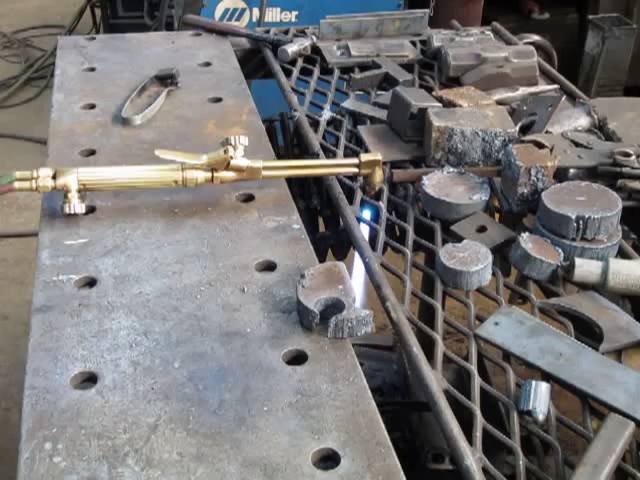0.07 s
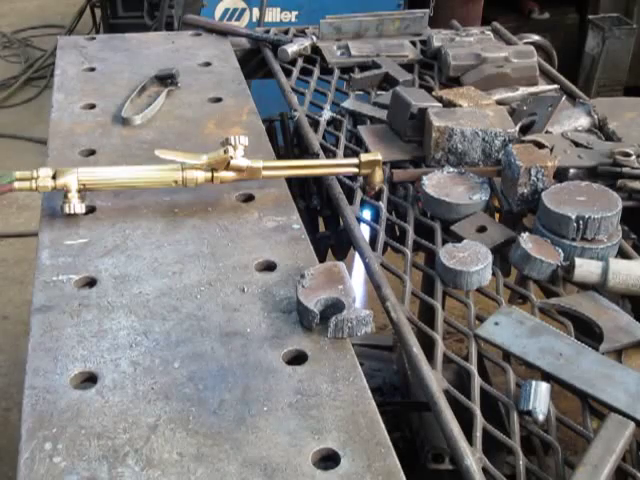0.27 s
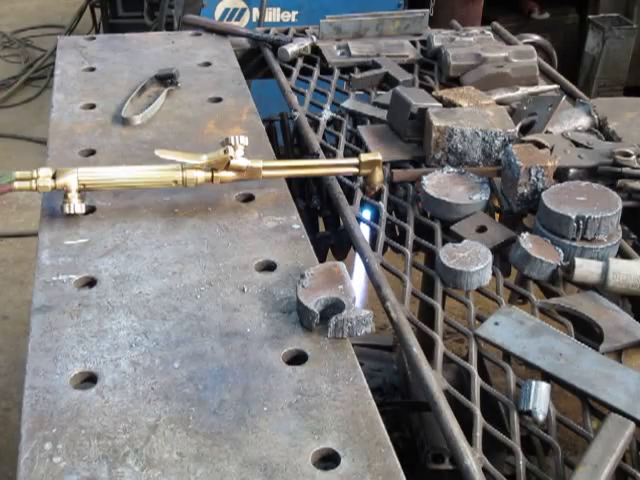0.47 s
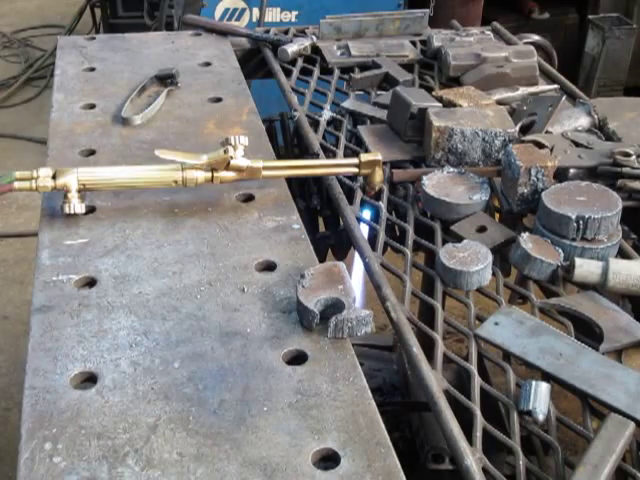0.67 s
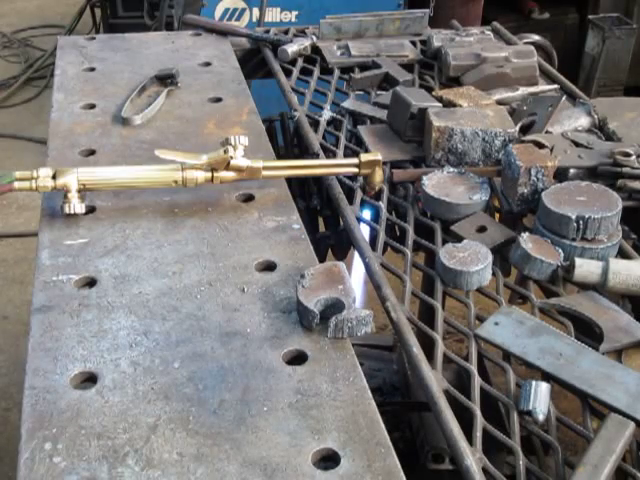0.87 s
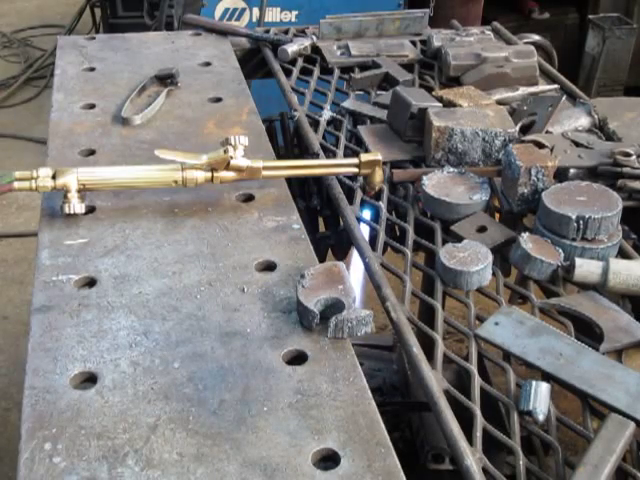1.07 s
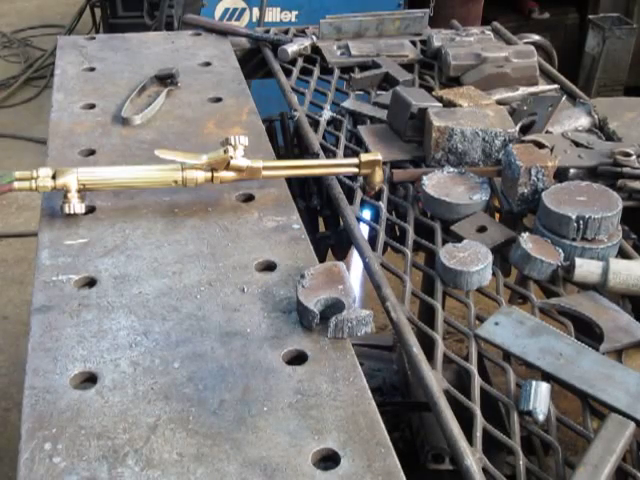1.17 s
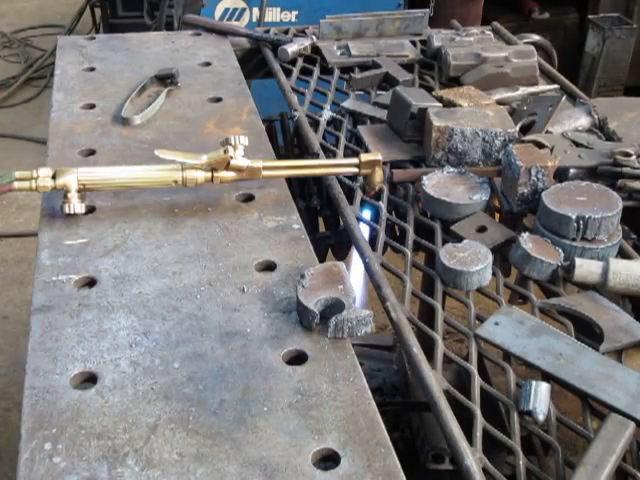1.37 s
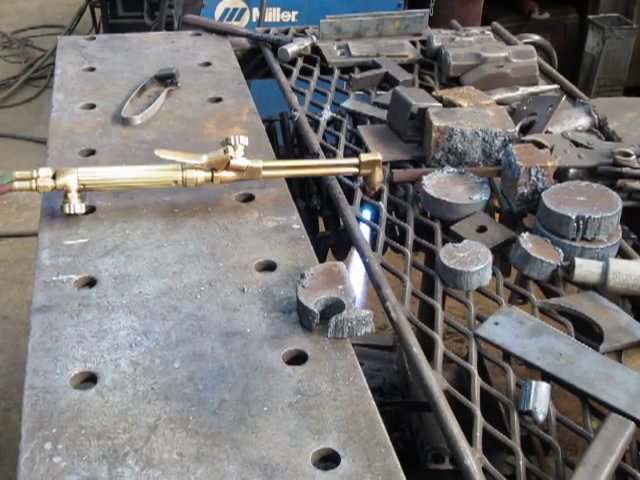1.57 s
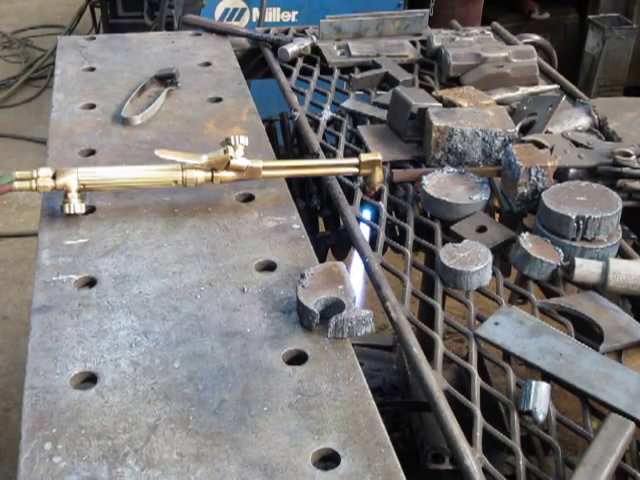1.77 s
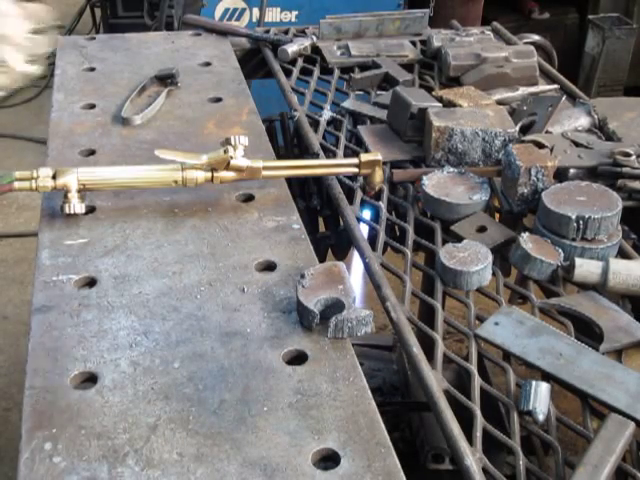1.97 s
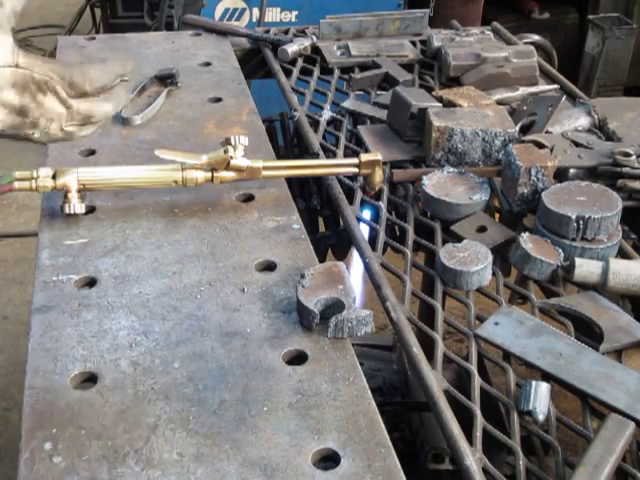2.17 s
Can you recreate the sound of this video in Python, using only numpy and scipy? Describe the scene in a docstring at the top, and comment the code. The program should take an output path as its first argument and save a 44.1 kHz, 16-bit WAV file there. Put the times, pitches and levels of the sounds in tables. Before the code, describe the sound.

Continuous gas torch roar, heavy in the low mids with a hollow, rough ring, under a fine hiss and thin wavering whistle; it swells over the first second, with one brief sputtering flare late on, heard close in a workshop.

```python
"""A broad roar, a hiss and a faint, unsteady high whistle cut in abruptly and grow a little stronger.
A lit gas cutting torch lies on a steel workbench and burns steadily. Its turbulent flame is noise
shaped by resonances of bench and workshop, over low drone tones and a hollow ring; the gas jet is
bright noise with one brief, grainy flare; the nozzle whistle is a jittery tone in a narrow rush."""
import sys
import numpy as np
from scipy import signal
from scipy.fft import rfft, irfft
from scipy.io import wavfile

SR = 44100
rng = np.random.default_rng(int(sys.argv[2]) if len(sys.argv) > 2 else 0)


def unload_audio(sound):
    """Save the sound as a 16-bit wav file, at the path given as the first command line argument."""
    columns = np.transpose(np.atleast_2d(sound))
    # keep every value between -1 and 1, then stretch to whole-number steps
    steps = np.round(np.clip(columns, -1, 1) * 32767)
    wavfile.write(sys.argv[1], SR, steps.astype(np.int16))


N = 98607

# strength of the flame: t/s, level/dB
FLAME_LEVEL = [(.04, -5.5), (.35, -4), (.7, -2), (.87, -0.9), (1.2, 0), (1.55, 0.3), (1.85, .5),
               (2.24, 0.34)]
# swell of the bass: t/s, level/dB
BASS_LEVEL = [(.04, -5), (.28, -5), (.5, -3.5), (.8, -1.5), (1.0, -2), (1.25, .8), (1.55, 0), (1.85, 0.6),
              (2.24, -1)]
FLUTTER_HZ = 37  # rate of the quick unsteadiness shared by roar, hiss, ring and drone


def amp(db):
    """Decibels to gain."""
    return 10 ** (np.asarray(db) / 20)


def unit(x):
    """Scales to an rms of one."""
    return x / np.sqrt(np.mean(x ** 2) + 1e-20)


def times():
    """Time of every sample in seconds."""
    return np.arange(N) / SR


def freqs():
    """Frequency of every bin in Hz."""
    return np.fft.rfftfreq(N, 1 / SR)


def curve(rows, axis=1):
    """One column of a table, joined by straight lines in time."""
    rows = np.array(rows)
    return np.interp(times(), rows[:, 0], rows[:, axis])


def spectrum(rows):
    """A table joined by straight lines over log frequency."""
    hz, value = np.transpose(rows)
    return np.interp(np.log(freqs() + 1), np.log(hz + 1), value)


def wander(rate_hz):
    """Random flutter of rms one: noise rolled off around the given rate, without slow drift."""
    slowest_hz = 6
    noise = rfft(rng.standard_normal(N))
    rolled_off = noise / (1 + (freqs() / rate_hz) ** 2)
    return unit(irfft(rolled_off * (freqs() > slowest_hz), N))


def wavering_phase(pitch_hz, jitter_hz, rate_hz):
    """Phase of a tone whose pitch is jittered at random (jitter as rms)."""
    return 2 * np.pi * np.cumsum(pitch_hz + jitter_hz * wander(rate_hz)) / SR


def turbulence(density_db):
    """Stereo noise of the given density (dB per Hz), whose width depends on frequency."""
    # likeness of the two channels: f/Hz, likeness (0 = independent, 1 = mono)
    likeness = [(20, .1), (42, 0.5), (60, 0.86), (85, 1), (250, 1), (700, 0.96), (1200, 0.92), (2200, .82),
                (3700, 0.8), (5500, 0.67), (8000, 0.57), (10500, 0.2), (12000, 0), (13500, .25),
                (16000, .2)]
    same = np.clip(spectrum(likeness), 0, 1)
    mid, side = rfft(rng.standard_normal((2, N)))
    mid = mid * np.sqrt((1 + same) / 2)
    side = side * np.sqrt((1 - same) / 2)
    left_right = np.array([mid + side, mid - side])
    return irfft(left_right * amp(density_db) * np.sqrt(SR / 2), N)


def lift_db(resonances):
    """Lift or dip in dB that a set of resonances gives each bin; their powers add up."""
    lift = 0
    for hz, width, db in resonances:
        bell = 1 / (1 + (2 * (freqs() - hz) / width) ** 2) ** 2
        lift = lift + (amp(db) ** 2 - 1) * bell
    return 10 * np.log10(np.maximum(1 + lift, .2))


def reflections(x):
    """A diffuse, decaying tail, different for each channel and already ringing at the start."""
    t60_s = 0.48
    t = np.arange(SR // 2) / SR
    tail = rng.standard_normal((2, len(t))) * np.exp(-np.log(1000) * t / t60_s)
    twice = np.tile(x, 2)  # the second pass carries the tail of the first
    return np.array([unit(signal.fftconvolve(twice, side)[N:2 * N]) for side in tail])


def drone():
    """Low, nearly steady tones that hold the rumble together and swell with the bass."""
    # tones, before the bass swell: f/Hz, level/dB
    drone_tones = [(87.3, -41), (135, -32), (190, -34)]
    total = 0
    for hz, db in drone_tones:
        tone = np.sin(wavering_phase(hz, jitter_hz=4.5, rate_hz=FLUTTER_HZ))
        total = total + amp(db) * unit(tone)
    return total * amp(curve(BASS_LEVEL))


def ring():
    """A hollow, rough ring inside the roar: one tone with wavering pitch and level."""
    # loudness of the ring: t/s, level/dB
    ring_level = [(.04, -30.5), (.4, -30), (.68, -41), (.86, -25.5), (1.1, -28), (1.3, -27), (1.5, -37.5),
                  (1.72, -27.5), (1.86, -34), (2.0, -27), (2.24, -46)]
    tone = np.sin(wavering_phase(557, jitter_hz=19.3, rate_hz=38))
    rough = tone * amp(4 * wander(FLUTTER_HZ))  # 4 dB rms
    return unit(rough) * amp(curve(ring_level))


def nozzle_whistle():
    """A nozzle tone with a weak octave, heard directly and by reflections, in a narrow rush of gas."""
    # glide and loudness of the tone: t/s, f/Hz, level/dB
    whistle_path = [(.04, 3122, -53.5), (.35, 3122, -48), (.56, 3125, -51.5), (.64, 3126, -44.5),
                    (.74, 3127, -46.5), (.79, 3122, -55.5), (.97, 3137, -45.5), (1.1, 3128, -50),
                    (1.33, 3132, -47), (1.47, 3128, -59), (1.56, 3128, -48), (1.68, 3128, -51),
                    (1.76, 3134, -41.5), (1.81, 3134, -50), (1.86, 3136, -44.5), (2.02, 3141, -47.5),
                    (2.24, 3143, -47)]
    octave_db, flutter_db, flutter_hz = -23, 2, 70
    wet = 0.31  # share of reflections in the mix
    rush_hz, rush_width_hz, rush_db = 3140, 158, -70  # peak density in dB per Hz, before the flame level

    phase = wavering_phase(curve(whistle_path), jitter_hz=15.7, rate_hz=133)
    tone = np.sin(phase) + amp(octave_db) * np.sin(2 * phase)
    tone = unit(tone * amp(flutter_db * wander(flutter_hz)))
    in_room = unit((1 - wet) * tone + wet * reflections(tone))

    skirt_db = 20 * np.log10(1 + (2 * (freqs() - rush_hz) / rush_width_hz) ** 2)
    rush = turbulence(rush_db - skirt_db)
    return in_room * amp(curve(whistle_path, axis=2)) + rush * amp(curve(FLAME_LEVEL))


def jet_flare():
    """The hiss flares once: a swell of grainy sputter and a few small spits shape bright noise."""
    # colour of the flare, before its envelope: f/Hz, density/dB per Hz
    flare_colour = [(2500, -100), (3800, -81.5), (4700, -82.5), (6000, -88), (9000, -95), (11500, -115)]
    # spits: t/s, level/dB
    spit_hits = [(1.809, -1), (1.827, -8), (1.845, 1)]
    centre_s, width_s, spit_s = 1.8, 0.072, 0.0014
    grain_db, grain_hz = 4.5, 260  # depth (rms) and rate of the sputter

    grain = unit(amp(grain_db * wander(grain_hz)))
    swell = grain / (1 + ((times() - centre_s) / width_s) ** 2)
    spits = sum(amp(db) * np.exp(-abs(times() - s) / spit_s) for s, db in spit_hits)
    return turbulence(spectrum(flare_colour)) * (swell + spits)


def jet_hiss():
    """Turbulence of the gas jet: bright noise that follows the flame with a flutter of its own."""
    # colour of the hiss, before its level: f/Hz, density/dB per Hz
    hiss_colour = [(1500, -73.5), (3500, -92), (4300, -88), (5700, -86.5), (7100, -91), (7900, -89.5),
                   (9000, -95), (10200, -99), (11200, -106), (12000, -116), (13200, -107.5),
                   (15700, -106.5)]
    # peaks and dips in the hiss: f/Hz, width/Hz, lift/dB
    hiss_peaks = [(5180, 300, -2.5), (6310, 130, 4), (6810, 130, 3.5), (7330, 300, -3), (7500, 200, 2),
                  (10270, 130, -0.5)]
    follow, flutter_db = 0.96, 0.53  # dB of hiss per dB of flame; flutter depth (rms)

    noise = turbulence(spectrum(hiss_colour) + lift_db(hiss_peaks))
    level_db = follow * curve(FLAME_LEVEL) + flutter_db * wander(FLUTTER_HZ)
    return noise * amp(level_db) + jet_flare()


def flame_roar():
    """Fluttering combustion noise, shaped by each resonance; its bass swells on its own."""
    # colour of the turbulent flame, before its level: f/Hz, density/dB per Hz
    roar_colour = [(20, -88), (40, -65), (56, -70.5), (70, -59.5), (108, -57.5), (150, -49.5), (240, -49),
                   (290, -51.5), (480, -53.5), (620, -52), (700, -52.5), (800, -58), (1000, -62),
                   (1300, -65.5), (1650, -68.5), (2000, -72), (2850, -79), (3600, -85), (6000, -105)]
    # resonances of bench and workshop that the roar excites: f/Hz, width/Hz, lift/dB
    room_modes = [(91.5, 13, 4.5), (117.7, 10, 6.5), (159.1, 7.3, 6), (184, 7.1, 1.5), (219.4, 10, 7),
                  (338, 6.4, 5.5), (354, 8.6, 1), (424.7, 10.7, 8.5), (462.3, 7, 5), (491, 11, 5),
                  (594, 12, 7), (1005, 6, 9), (1058, 8.9, -2.5), (1171, 14, 6.5), (1446, 31, 2),
                  (1570, 15, 4), (1633, 26, 5.5)]
    bass_top_hz, flutter_db = 270, 0.39  # flutter depth as rms

    above_top = np.maximum(freqs() / roar_colour[-1][0], 1) ** 2  # keeps falling past the last row
    density_db = spectrum(roar_colour) + lift_db(room_modes) - 20 * np.log10(above_top)
    noise = turbulence(density_db)
    bass = irfft(rfft(noise) / (1 + (freqs() / bass_top_hz) ** 8), N)
    body = noise - bass
    swelling = bass * amp(curve(BASS_LEVEL)) + body * amp(curve(FLAME_LEVEL))
    return swelling * amp(flutter_db * wander(FLUTTER_HZ))


def scene():
    """All layers of the torch, slightly to the right."""
    torch = drone() + ring() + nozzle_whistle() + jet_hiss() + flame_roar()
    return torch * amp([[-.2], [.2]])  # left and right in dB


def record(dry):
    """Silence, an abrupt cut-in, and a steep treble limit."""
    start_s, open_s, cutoff_hz = 0.035, 0.0021, 15760
    opened = dry * np.clip((times() - start_s) / open_s, 0, 1)
    lowpass = signal.firwin(511, cutoff_hz, window=("kaiser", 9), fs=SR)
    return signal.oaconvolve(opened, lowpass[None], "same")


dry = scene()
out = record(dry)
unload_audio(out)
```